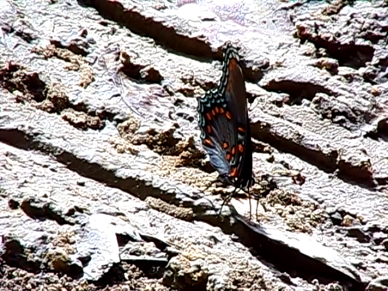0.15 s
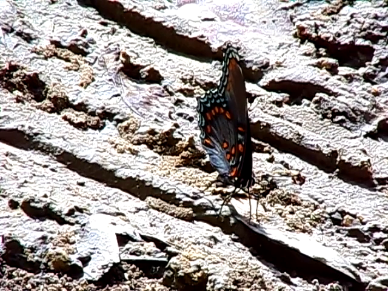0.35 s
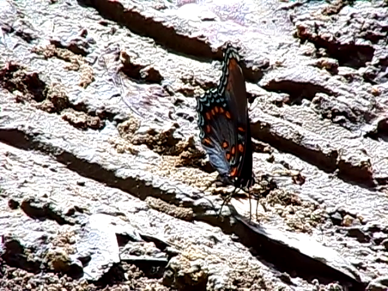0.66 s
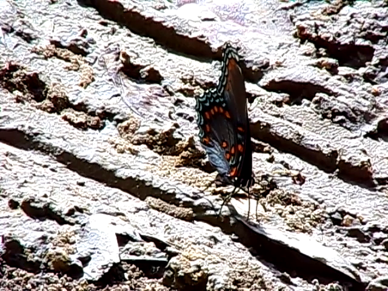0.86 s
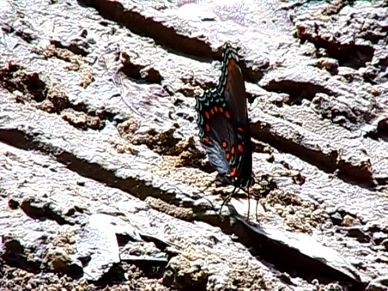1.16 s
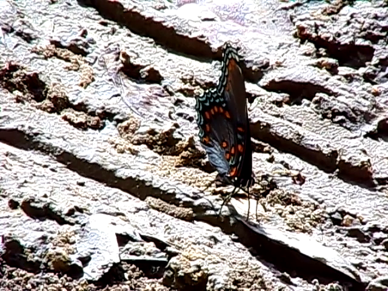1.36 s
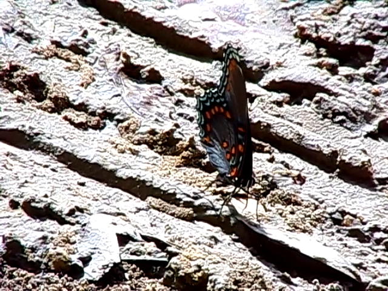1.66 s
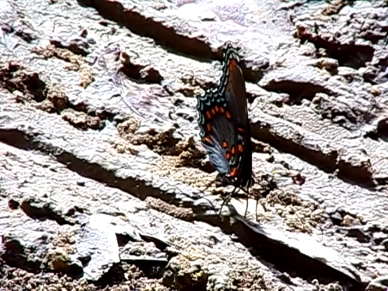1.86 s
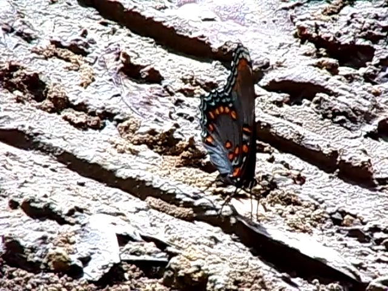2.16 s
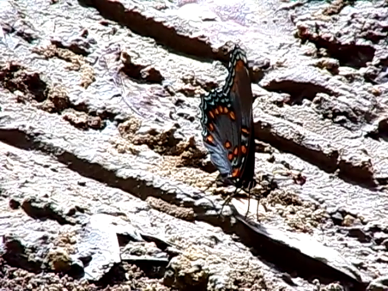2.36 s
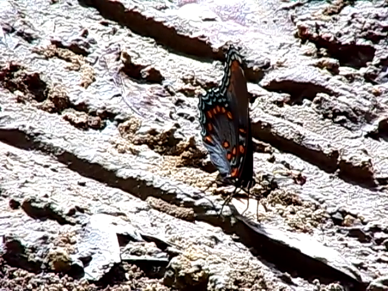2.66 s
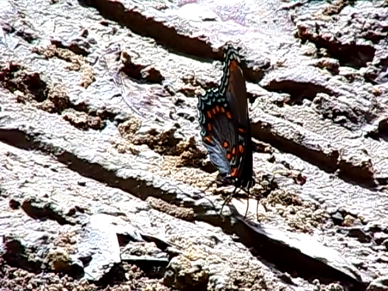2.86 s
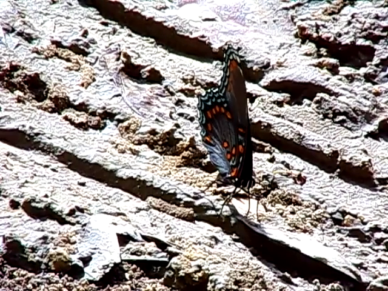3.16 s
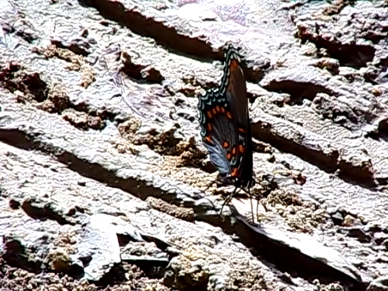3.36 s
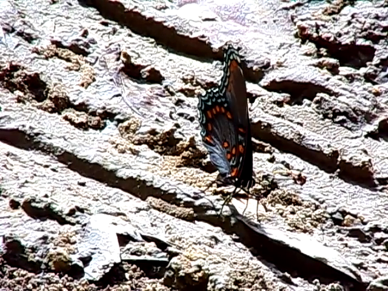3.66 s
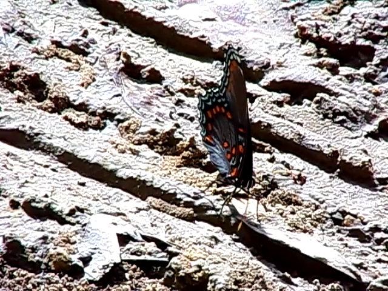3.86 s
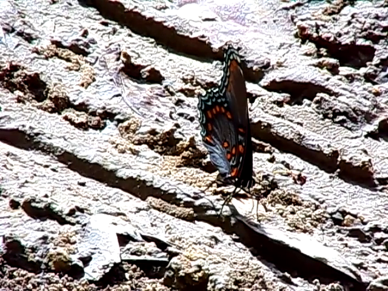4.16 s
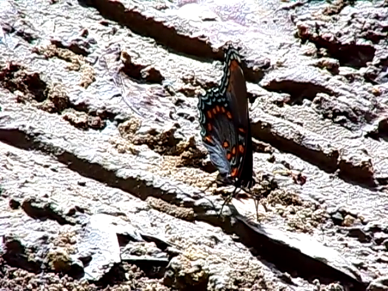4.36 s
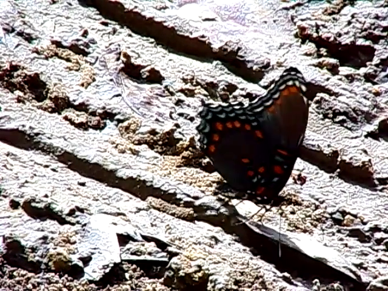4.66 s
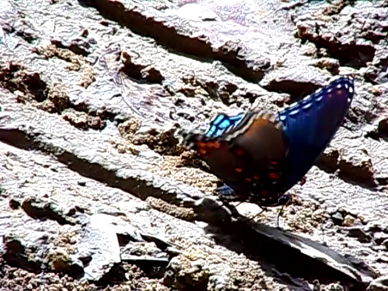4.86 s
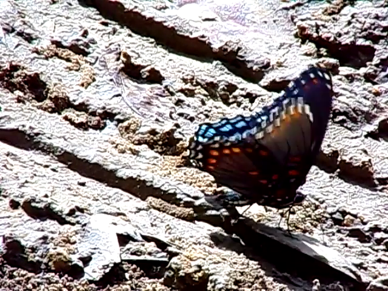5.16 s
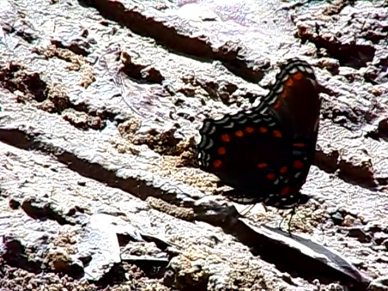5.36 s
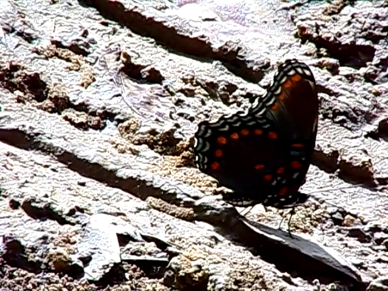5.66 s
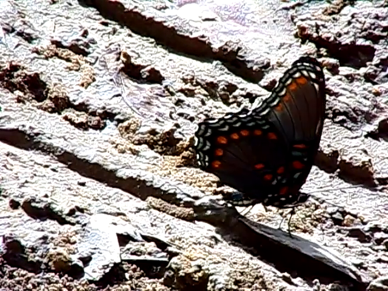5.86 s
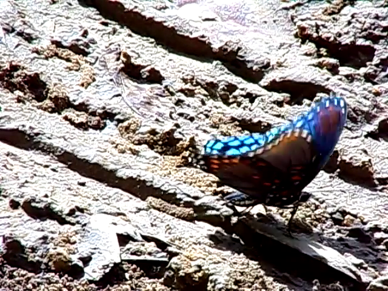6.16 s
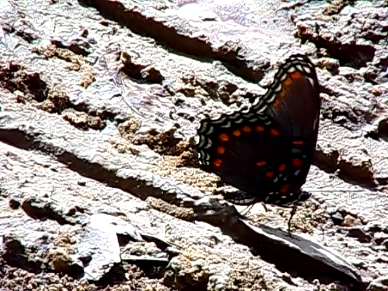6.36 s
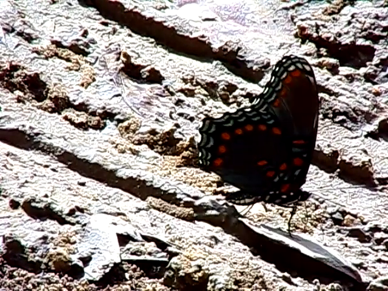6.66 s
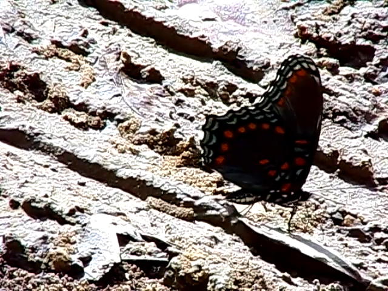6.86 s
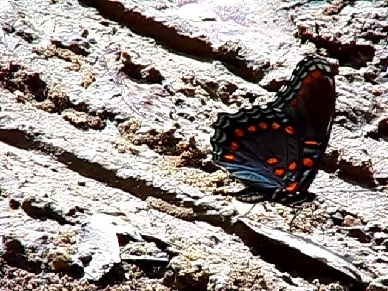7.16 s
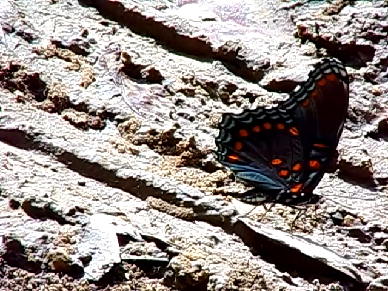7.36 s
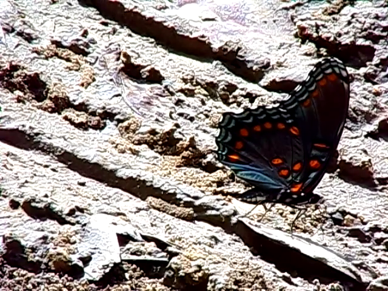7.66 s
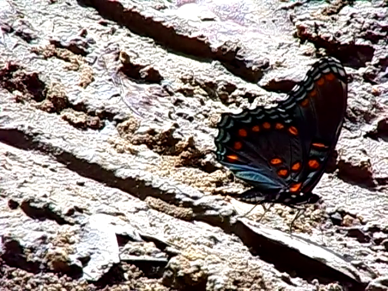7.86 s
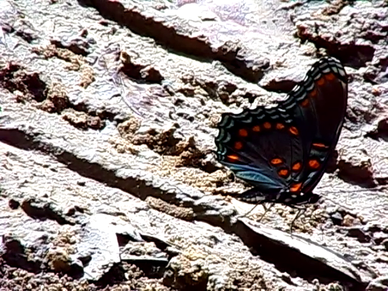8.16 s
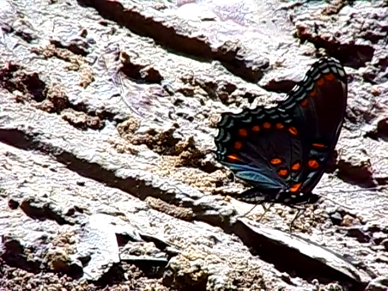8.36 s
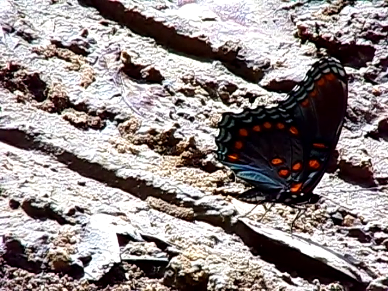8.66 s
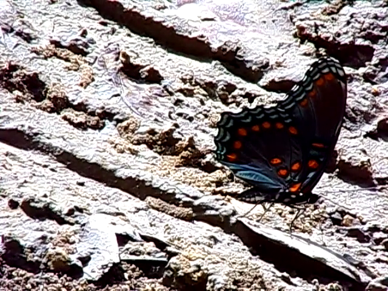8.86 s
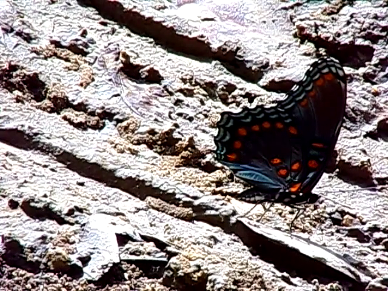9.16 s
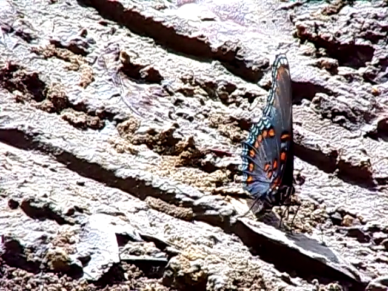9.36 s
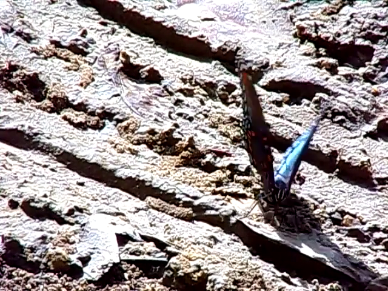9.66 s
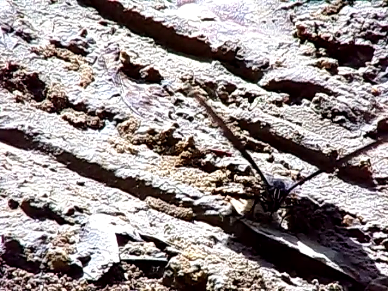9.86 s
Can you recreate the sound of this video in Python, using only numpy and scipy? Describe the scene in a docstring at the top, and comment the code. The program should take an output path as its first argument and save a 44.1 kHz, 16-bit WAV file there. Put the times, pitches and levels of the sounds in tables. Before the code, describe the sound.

A near cicada throbs rapidly over the steady high rasp of distant cicadas, while crickets trill in phrases and birds chip and whistle.

```python
"""Among trees on a hot day, a near cicada throbs over the steady rasp of far ones: shaped noise, clicks and a ring.
Crickets trill in tone bursts, one per wing stroke; a katydid ticks in scrapes of high-pitched noise.
A bird sings rising trills and whistles and far birds chip, all gliding sines; twigs tick, and bumps and a
rustle of handling come as bursts of filtered noise. Rumble, hiss, a low hum and a faint high whine, in mono."""
import sys
import numpy as np
from scipy import signal
from scipy.fft import rfft, irfft
from scipy.io import wavfile

SR = 44100
rng = np.random.default_rng(int(sys.argv[2]) if len(sys.argv) > 2 else 0)


def master_out(mix):
    """Clip the mix to full scale and print it as 16-bit PCM to the path in sys.argv[1]."""
    frames = np.transpose(np.atleast_2d(mix))
    ceiling = np.clip(frames, -1, 1)
    pcm = np.round(ceiling * 32767).astype(np.int16)
    wavfile.write(sys.argv[1], SR, pcm)


N = 441000


def gain_of(db):
    """Level is logarithmic: 20 dB is a factor of ten in amplitude."""
    return 10 ** (np.asarray(db) / 20)


def evened(x):
    """Root-mean-square normalisation: scales x to rms 1."""
    return x / np.sqrt(np.mean(x ** 2) + 1e-20)


def columns(rows, t):
    """Linear interpolation: joins the rows of a curve table, whose first column is time, by straight lines."""
    s, *values = np.transpose(rows)
    return [np.interp(t, s, v) for v in values]


def add(mix, s, sound):
    """Superposition: adds a sound into the mix from s seconds on."""
    part = mix[round(s * SR):][:len(sound)]
    part += sound[:len(part)]


def ramped(since_start, until_end, rise_s, fall_s):
    """Amplitude envelope: a straight rise from 0 to 1 and a straight fall back to 0."""
    return np.clip(np.minimum(since_start / rise_s, until_end / fall_s), 0, 1)


def coloured(x, body):
    """Linear filtering: a body's resonances weight the spectrum of x, here brought to rms 1."""
    hz, db = np.transpose(body)
    bins = np.fft.rfftfreq(len(x), 1 / SR) + 1
    weight_db = np.interp(np.log(bins), np.log(hz), db, -90, -90)
    return evened(irfft(rfft(x) * gain_of(weight_db), len(x)))


def drift(cutoff_hz):
    """Low-passed noise: a random fluctuation of rms 1, slower than about cutoff_hz."""
    step = 50  # samples between coarse points
    lowpass = signal.butter(2, cutoff_hz, fs=SR / step, output="sos")
    coarse = signal.sosfilt(lowpass, rng.standard_normal(N // step + 500))[499:]  # filter settled
    return evened(np.interp(np.arange(N) / step, np.arange(len(coarse)), coarse))


def trees(x, t60, wet_db):
    """Multiple scattering: trunks and leaves return sparse echoes that fall 60 dB in t60 seconds."""
    t = np.arange(SR // 2) / SR
    sparse = rng.standard_normal(len(t)) * (rng.random(len(t)) < .05)
    echoes = sparse * gain_of(-60 * t / t60) * (t > .004)
    return x + gain_of(wet_db) * signal.oaconvolve(x, echoes / np.linalg.norm(echoes))[:N]


def near_cicada():
    """Impulsive excitation of a resonator: dense rib clicks ring the body in each throb, over a ring sliding down."""
    # Throb timing. Each row: time in seconds, lead over the steady beat in throbs.
    throb_leads = [(0.0, -0.44), (0.7, -0.2), (1.5, 0.12), (2.3, 0.26), (2.6, 0.026), (2.9, 0.37),
                   (4.1, 0.72), (4.3, 0.39), (4.75, 0.36), (5.3, 0.49), (5.8, -0.1), (6.4, -0.46),
                   (7.5, -1.02), (8.3, -0.97), (8.6, -1.01), (8.9, -0.9), (9.5, -0.88), (10.0, -0.66)]
    # Songs. Each row: start in seconds, end in seconds, relative level in dB.
    songs = [(-1.5, 4.76, -46), (5, 11, -45.5)]
    # Body resonances. Each row: frequency in Hz, relative spectral density in dB per Hz.
    near_body = [(6000, -31), (6900, -11.5), (7450, -4.5), (7950, -6.5), (9200, -7.5), (9800, 2),
                 (10500, -15), (11000, -10), (11800, -22), (13500, -29.5), (15700, -32)]
    throbs_per_s = 13.5  # of the steady beat
    t = np.arange(N) / SR
    lead, = columns(throb_leads, t)
    # a song swells in slowly and breaks off
    level = sum(gain_of(db) * ramped(t - s, end - t, rise_s=0.88, fall_s=0.05) for s, end, db in songs)
    place = (throbs_per_s * t + lead + 0.24) % 1  # within the throb
    onset = np.clip(place / 0.02, 0, 1)
    build = 0.7 + 0.25 * np.clip(place / 0.16, 0, 1)
    gate = onset * build * np.clip((.5 - place) / 0.14, 0, 1)  # silent second half
    clicks = rng.standard_normal(N) * (rng.random(N) < .3)
    ring_hz = 7620 - 700 * place
    ring = drift(cutoff_hz=110) * np.sin(2 * np.pi * np.cumsum(ring_hz) / SR)
    buzz = coloured(clicks, near_body) + gain_of(-7.5) * ring
    song = buzz * gate * level * gain_of(.5 * drift(cutoff_hz=9.6))
    return trees(song, t60=0.097, wet_db=-11.0)


def far_cicadas():
    """Incoherent summation: many singers merge into coloured noise that flickers a little in level."""
    # Level of the far singers. Each row: time in seconds, level in dB.
    far_levels = [(0, -46.5), (4.4, -46), (4.85, -47), (5.7, -46.5), (10, -47.5)]
    # Their common spectrum. Each row: frequency in Hz, relative spectral density in dB per Hz.
    far_body = [(2300, -31.5), (2800, -23.5), (3200, -18.5), (4800, -12.5), (5560, -12.5), (5780, -12.5),
                (6200, -5), (6600, -5.5), (7400, -1), (7850, -4.5), (9200, 1), (10600, -4), (11600, -20),
                (13200, -25.5), (15700, -31)]
    level_db, = columns(far_levels, np.arange(N) / SR)
    return coloured(rng.standard_normal(N), far_body) * gain_of(level_db + 0.4 * drift(cutoff_hz=29))


def crickets(singers, level_db, waver_hz, swell_db, wet_db, middle_hz=0):
    """Stridulation: each wing stroke is a tone burst sagging in pitch; every singer has its own pace and echoes."""
    out = np.zeros(N)
    for hz, strokes_per_s, db in singers:
        pace = strokes_per_s * (1 + .05 * drift(cutoff_hz=3.05))
        place = (np.cumsum(pace) / SR + rng.random()) % 1  # within the stroke
        pitch = middle_hz + hz + waver_hz * drift(cutoff_hz=12) - 120 * (place - .3)
        stroke = np.sin(np.pi * np.clip(place / 0.65, 0, 1)) * gain_of(db + swell_db * drift(cutoff_hz=7.7))
        tone = stroke * np.sin(2 * np.pi * np.cumsum(pitch) / SR) * gain_of(level_db - 4.5)
        out += trees(tone, t60=0.13, wet_db=wet_db)
    return out * np.sqrt(8 / len(singers))  # a group's power does not grow with its number


def low_phrases(t):
    """Power addition: each phrase is an arch of climbing pitch; returns level in dB and power-weighted middle Hz."""
    # Rising phrases. Each row: start in seconds, length in seconds, relative level in dB, first middle pitch in Hz.
    rising = [(-.35, 0.56, -52, 5170), (0.34, 0.6, -58, 5180), (0.832, 0.64, -52, 5170),
              (1.54, 0.58, -53, 5185), (2.19, 0.55, -53, 5200), (2.879, 0.44, -52, 5130),
              (3.4, 0.34, -54, 5140), (3.662, .74, -52.5, 5180), (4.47, 0.56, -51, 5143),
              (5.22, 0.5, -52.5, 5160), (5.799, 0.61, -53, 5190), (6.369, 0.53, -55, 5180),
              (6.901, 0.57, -52.5, 5120), (7.375, 0.46, -53, 5210), (8.15, 0.57, -53.5, 5150),
              (8.901, .62, -54, 5170), (9.5, 0.66, -53.5, 5160)]
    climb_hz_per_s, fullness = 250, .8  # a smaller exponent makes a fuller arch
    between_db, between_hz = -61, 5284  # singers heard between phrases
    power = gain_of(2 * between_db) * np.ones(N)
    weighted_hz = power * between_hz
    for s, length, db, hz in rising:
        half_sine = abs(np.sin(np.pi * np.clip((t - s) / length, 0, 1)))
        arch = gain_of(2 * db) * half_sine ** (2 * fullness)
        power = power + arch
        weighted_hz = weighted_hz + arch * (hz + climb_hz_per_s * (t - s))
    return 10 * np.log10(power), weighted_hz / power


def cricket_field():
    """Frequency partition: four groups of crickets sing at different pitches, the far ones with more echo."""
    # Low singers. Each row: wing pitch from the group's middle in Hz, strokes a second, relative level in dB.
    low_group = [(-230, 50, -2.5), (-120, 53, -2.5), (-40, 55, 1), (5, 57, 1), (50, 59, 1.5), (110, 62, -4)]
    # The other singers. Each row: wing pitch in Hz, strokes a second, relative level in dB.
    high_singer, deep_singer = [(5440, 57, 0)], [(2882, 48, 0)]
    middle_singers = [(3570, 42, -2.5), (3720, 50, -2), (3803, 44, 0)]
    # Phrases of the high singer. Each row: start in seconds, length in seconds, relative level in dB.
    high_phrases = [(-.1, 0.18, -54), (1.07, .24, -58), (2.87, .24, -54.5), (4.694, 0.27, -55.5),
                    (6.049, 0.28, -57), (7.155, 0.22, -55)]
    # Far groups. Each row: time in seconds, deep singer's and middle singers' relative levels in dB.
    far_crickets = [(0, -77.5, -72.5), (1.1, -74, -71), (1.9, -79.5, -68), (4.3, -85, -68.5),
                    (6, -91, -68.5), (6.6, -77.5, -71), (8, -75, -73), (10, -74, -74)]
    t = np.arange(N) / SR
    low_db, low_hz = low_phrases(t)
    deep_db, middle_db = columns(far_crickets, t)
    high_level = sum(gain_of(db) * ramped(t - s, s + length - t, rise_s=0.047, fall_s=0.036)
                     for s, length, db in high_phrases)
    high_db = 20 * np.log10(high_level + 1e-9)
    low = crickets(low_group, low_db, waver_hz=30.16, swell_db=1.0, wet_db=-3.0, middle_hz=low_hz)
    high = crickets(high_singer, high_db, waver_hz=30, swell_db=2.0, wet_db=-3.5)
    deep = crickets(deep_singer, deep_db, waver_hz=25.05, swell_db=1.5, wet_db=4)
    middle = crickets(middle_singers, middle_db, waver_hz=25.0, swell_db=2.5, wet_db=1.5)
    return low + high + deep + middle


def air():
    """Broadband noise plus steady partials: low outdoor rumble and hiss, under faint tones wavering in level."""
    # Outdoor noise. Each row: frequency in Hz, relative spectral density in dB per Hz.
    air_body = [(40, -27), (58, -5.5), (95, 0), (300, -9.5), (800, -17), (1600, -19.5), (1780, -14.5),
                (2000, -19), (2400, -18.5), (3100, -36)]
    # Faint steady tones: a low hum and a high whine. Each row: frequency in Hz, middle rms level in dB.
    steady_tones = [(119.6, -83.5), (239.3, -89.5), (299.9, -89.5), (539.7, -97.5), (1210.8, -92.5),
                    (2620, -86.5)]
    air_db = -73.5
    t = np.arange(N) / SR
    tones = np.zeros(N)
    for hz, db in steady_tones:
        level = gain_of(db + 1.85 * drift(cutoff_hz=3.5)) * np.sqrt(2)  # rms to peak
        tones += level * np.sin(2 * np.pi * (hz * t + rng.random()))
    return gain_of(air_db + .5 * drift(cutoff_hz=8.7)) * coloured(rng.standard_normal(N), air_body) + tones


def note(db, hz, length, rise_hz, burr=0, bend=0.25, droop=0.11):
    """Frequency modulation: a short sine slides towards its pitch and droops; a burr shakes pitch and level."""
    u = np.arange(round(length * SR)) / (length * SR)  # 0 to 1 along the note
    shake = np.sin(2 * np.pi * 85 * length * u)  # 85 Hz
    pitch = hz - rise_hz * (np.exp(-u / bend) + droop * u ** 4) + 120 * burr * shake
    swell = np.sin(np.pi * u ** 0.78) ** 0.61
    return gain_of(db) * (1 + burr * shake) * swell * np.sin(2 * np.pi * np.cumsum(pitch) / SR)


def birds():
    """Direct-to-reverberant ratio: near trills and whistles stand clear, burry chips of far birds are wetter."""
    # Trills. Each row: first and last note in seconds, first and last level in dB, last note's pitch in Hz.
    trills = [(0.572, 0.689, -68, -48.5, 2986), (0.987, 1.137, -59, -50, 3070),
              (2.049, 2.17, -62, -47.5, 3050), (3.5054, 3.5966, -63, -48, 3070),
              (3.856, 4.0396, -64.5, -53.5, 2860)]
    # Near whistles. Each row: start in seconds, peak in dB, pitch aimed at in Hz, length in seconds, rise in Hz.
    whistles = [(7.197, -47, 2940, 0.023, 377), (7.321, -47.5, 3137, 0.033, 650),
                (7.489, -50.5, 2900, 0.045, 400)]
    # Far chips. Each row: start in seconds, level in dB, pitch aimed at in Hz, length in seconds, rise in Hz.
    chips = [(0.134, -59, 4260, 0.034, 2), (.177, -60, 3780, 0.016, 0), (0.728, -61, 3810, 0.033, 48),
             (0.745, -58, 4110, 0.052, 147), (2.459, -57, 4060, 0.036, 103), (2.985, -61, 4390, 0.054, 4),
             (3.268, -60, 3940, 0.022, -100), (3.273, -57, 3540, 0.02, 0), (4.7, -56, 4020, 0.042, 96),
             (5.115, -62, 3780, 0.027, -4), (5.263, -56.5, 3960, 0.03, 102), (6.556, -61, 3320, 0.025, 100),
             (6.947, -60.5, 3170, 0.046, 262), (7.808, -64, 3730, 0.031, 0), (8.299, -63, 3180, 0.031, 200),
             (8.615, -59.5, 3100, 0.034, 194), (8.825, -62, 3890, 0.035, -4),
             (9.056, -61, 3740, 0.049, -54), (9.5, -66, 4290, 0.057, 67), (9.769, -66, 4170, 0.038, 0.5),
             (9.834, -64, 3130, 0.037, 206)]
    note_gap_s, hurry_s = .0238, 0.00203  # approximate spacing, lead of the inner notes
    low_hz, lift = 2566, 0.53  # trill's base pitch, share of the lift above it left one note earlier
    near, far = np.zeros(N), np.zeros(N)
    for first, last, first_db, last_db, last_hz in trills:
        gaps = round((last - first) / note_gap_s)
        for back in range(gaps + 1):  # counted back from the last note, each lower and softer
            hz = low_hz + (last_hz - low_hz) * lift ** back
            db = last_db - (last_db - first_db) * back / gaps
            top = np.clip((hz - 2700) / 250, 0, 1)  # high notes last longer and bend upward more
            s = last - (last - first) * back / gaps - hurry_s * (0 < back < gaps)
            add(near, s - .002, note(db, hz, 0.0098 + 0.0047 * top, 40 + 250 * top))
    for s, *shape in whistles:
        add(near, s, note(*shape, bend=0.465, droop=0.37))
    for s, *shape in chips:
        add(far, s, note(*shape, burr=0.73))
    return trees(near, t60=0.48, wet_db=-5.5) + trees(far, t60=0.32, wet_db=-0.6)


def ticks():
    """Damped resonance: a snap and dying crackle ring near one pitch; bumps and a rustle are band-passed noise."""
    # Ticks close by. Each row: start in seconds, relative level in dB, ring in Hz, 60 dB decay in seconds.
    snaps = [(1.55, -63, 1500, .03), (2.491, -59, 3020, .014), (2.863, -55, 3000, 0.016),
             (2.898, -61, 1570, .04), (3.475, -57.5, 2600, 0.025), (3.67, -63, 1500, .02),
             (4.847, -56.5, 2220, 0.057), (4.964, -60, 2200, .02), (4.969, -61.5, 1200, 0.05),
             (5.032, -63, 1500, .02), (5.929, -66, 1890, 0.027), (6.259, -63, 1500, 0.032),
             (8.286, -62.5, 1200, 0.034), (8.638, -61.5, 2190, 0.054), (8.979, -58.5, 1710, 0.14),
             (8.993, -53, 520, 0.059), (9.07, -67, 2160, 0.095), (9.339, -59, 3030, .016)]
    # Soft handling bumps and a rustle. Each row: start in seconds, relative level in dB, middle frequency in Hz,
    # length in seconds.
    thumps = [(0.845, -68.5, 1510, .075), (7.977, -65.5, 330, 0.11), (8.978, -59.5, 486, 0.069)]
    out, t = np.zeros(N), np.arange(SR // 5) / SR
    for s, db, hz, t60 in snaps:
        crackle = rng.standard_normal(len(t)) + 6 * (t == 0)  # the snap leads
        ring = signal.lfilter(*signal.iirpeak(hz, 1.8, SR), crackle)
        wide = signal.lfilter(*signal.butter(1, [450, 4800], "band", fs=SR), crackle)
        decay = gain_of(db - 7.0 - 60 * t / max(t60, .005))
        add(out, s, decay * (evened(ring) + hz / 1500 * evened(wide)))  # high ticks are wider
    for s, db, hz, length in thumps:
        band = signal.butter(2, [0.57 * hz, 1.32 * hz], "band", fs=SR)
        lump = evened(signal.lfilter(*band, rng.standard_normal(len(t))))
        add(out, s, gain_of(db - 11 * t / length) * lump * ramped(t, length - t, rise_s=0.0039, fall_s=0.013))
    return out


def katydid():
    """Amplitude modulation: noise of the top octave is cut into short dry scrapes."""
    # High ticking. Each row: time in seconds, level in dB, ticks a second.
    ticking = [(3.1, -97, 39), (3.3, -79, 48), (4.02, -74, 39), (4.07, -72, 20), (4.4, -71, 19.7),
               (4.75, -76, 20), (5.08, -74, 20), (5.1, -73, 15), (5.6, -76, 16), (5.75, -95, 16)]
    # Wing resonances. Each row: frequency in Hz, relative spectral density in dB per Hz.
    wing_body = [(11500, -36), (12400, -6), (13000, -5), (14200, -2), (15700, -7)]
    tick_falls_s = 4.9  # a moment on the beat
    level_db, ticks_per_s = columns(ticking, np.arange(N) / SR)
    turns = np.cumsum(ticks_per_s) / SR
    place = (turns - turns[round(tick_falls_s * SR)]) % 1
    age = place / ticks_per_s / 0.0032  # since the tick began, in units of 3.2 ms
    scrape = age * np.exp(-age) * gain_of(1.5 * drift(cutoff_hz=15))
    return coloured(rng.standard_normal(N), wing_body) * evened(scrape) * gain_of(level_db)


def scene():
    """Superposition: all sources add at one microphone, which feeds both channels."""
    insects = near_cicada() + far_cicadas() + cricket_field() + katydid()
    return np.tile(insects + air() + birds() + ticks(), (2, 1))


def record(dry):
    """Band limitation: a steep linear-phase low-pass ends the spectrum."""
    edge_hz = 15780
    edge = signal.firwin(1023, edge_hz, window=("kaiser", 9), fs=SR)
    return signal.oaconvolve(dry, edge[None], "same")


dry = scene()
out = record(dry)
master_out(out)
```